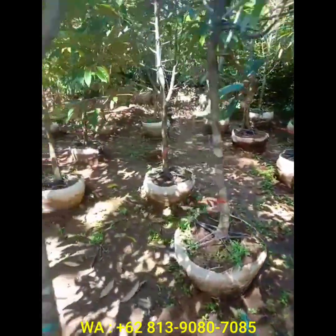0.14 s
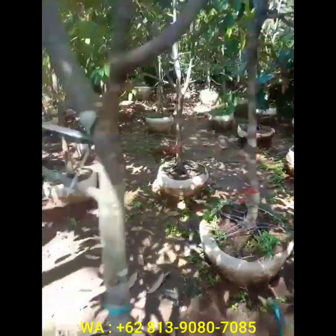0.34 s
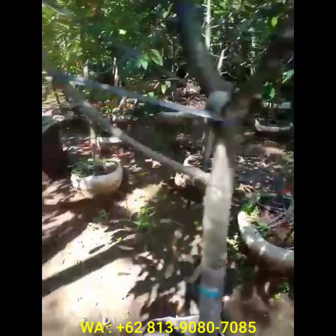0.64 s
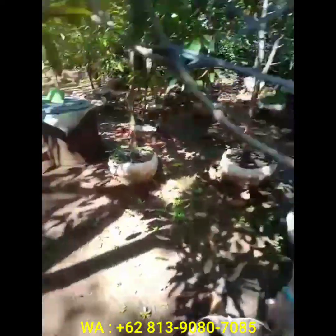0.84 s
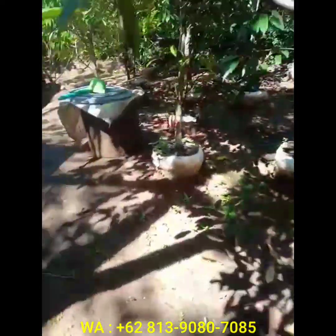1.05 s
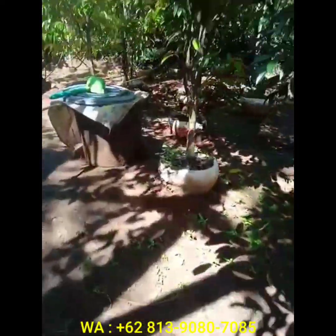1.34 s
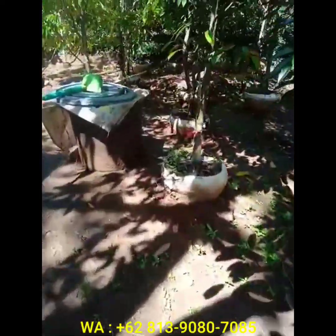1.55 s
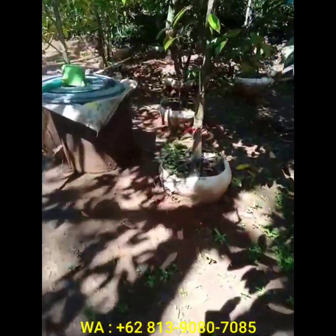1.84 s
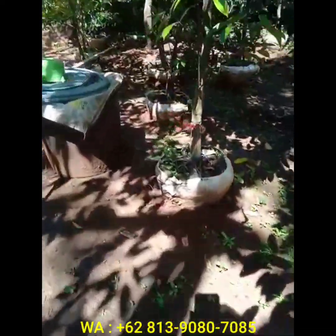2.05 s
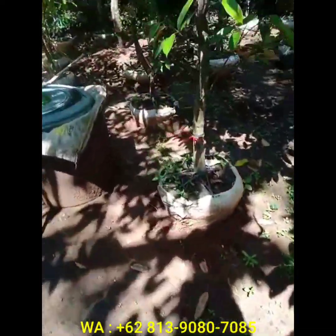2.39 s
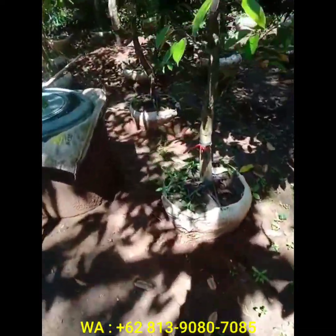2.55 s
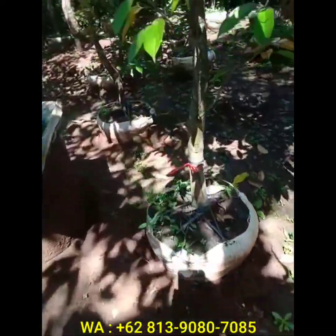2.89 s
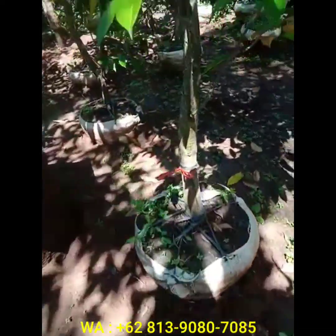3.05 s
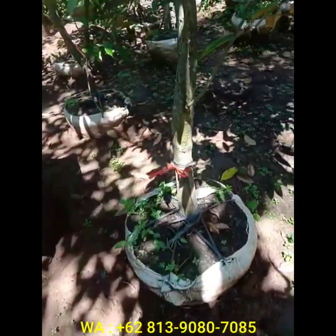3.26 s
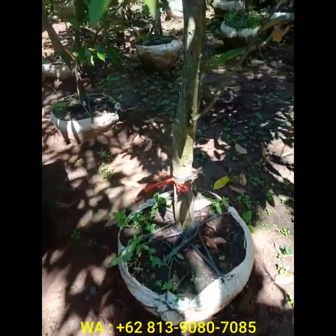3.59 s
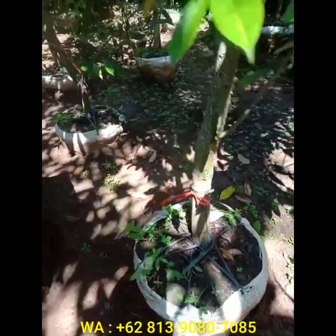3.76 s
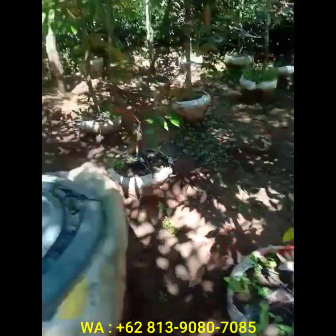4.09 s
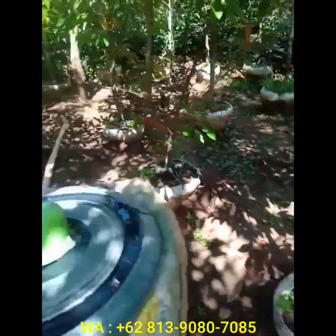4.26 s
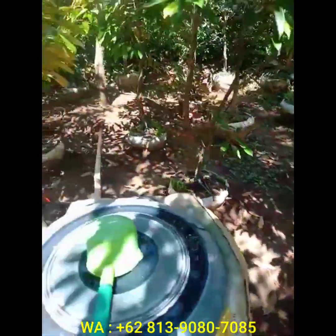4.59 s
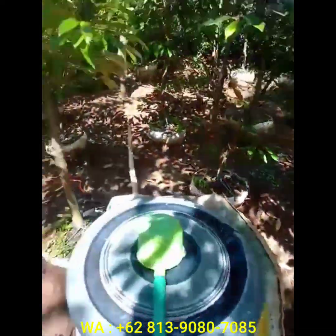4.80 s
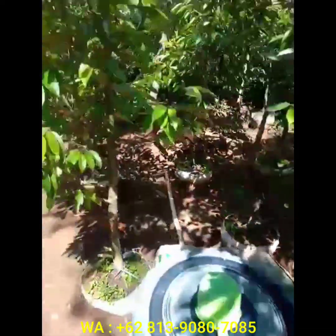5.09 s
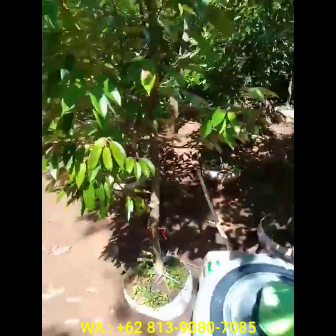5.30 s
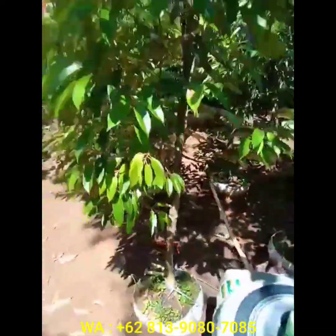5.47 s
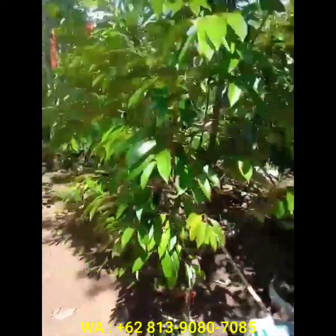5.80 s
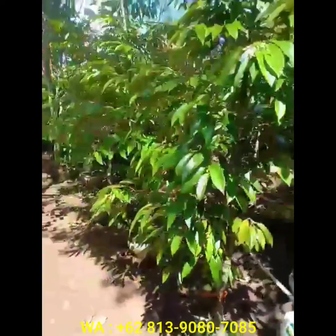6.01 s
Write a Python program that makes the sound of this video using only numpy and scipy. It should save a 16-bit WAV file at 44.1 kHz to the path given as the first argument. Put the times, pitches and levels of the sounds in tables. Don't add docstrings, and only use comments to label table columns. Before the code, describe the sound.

Slow steps crush dry leaves and snap twigs, loudest in the first two seconds, then sparse crackles, a hollow scuff and foliage brushing past.

```python
import sys
import numpy as np
from scipy import signal
from scipy.io import wavfile

SR = 44100
rng = np.random.default_rng(int(sys.argv[2]) if len(sys.argv) > 2 else 0)


def unload_wav(signal):
    wavfile.write(
        sys.argv[1],
        SR,
        np.round(np.clip(np.atleast_2d(signal).T, -1, 1) * 32767).astype(np.int16),
    )


def convert_level_to_amplitude(level_db):
    exponent = np.asarray(level_db, float) / 20
    return 10 ** exponent


N = 270897


def rms_one(x):
    return x / np.sqrt(np.mean(x ** 2) + 1e-20)


def peak_one(x):
    return x / np.max(np.abs(x))


def band(x, low_hz, high_hz):
    sos = signal.butter(2, [low_hz, high_hz], "band", fs=SR, output="sos")
    return signal.sosfilt(sos, x + 1e-18)


def resonance(x, hz, width_hz):
    r = np.exp(-np.pi * width_hz / SR)
    zeros = np.array([1, 0, -1]) * (1 - r * r) / 2
    poles = [1, -2 * r * np.cos(2 * np.pi * hz / SR), r * r]
    return signal.lfilter(zeros, poles, x + 1e-18)


def drift(rate_hz):
    r = np.exp(-80 * np.pi * rate_hz / SR)
    slow = signal.lfilter([1], [1, -2 * r, r * r], rng.standard_normal(N // 40 + 2002))[2000:]
    return np.interp(np.arange(N) / 40, np.arange(len(slow)), rms_one(slow))


def swells(starts, lengths, levels_db, rise, fall, rest_db):
    t = np.arange(0, N + 64, 64) / SR
    s, length, db = (np.array(v)[:, None] for v in (starts, lengths, levels_db))
    before, after = np.maximum(s - t, 0), np.maximum(t - s - length, 0)
    power = convert_level_to_amplitude(2 * (db - rise * before - fall * after))
    total_db = 10 * np.log10(power.sum(axis=0) + convert_level_to_amplitude(2 * rest_db))
    return np.interp(np.arange(N) / SR, t, total_db)


def coloured(spectrum, patchy_db, rate_hz):
    hz, level_db = np.transpose(spectrum)
    edges = np.geomspace(hz[0], hz[-1], 14)
    white, out = rng.standard_normal((2, N)), 0
    for k, (low, high) in enumerate(zip(edges, edges[1:])):
        here_db = np.interp(np.log(low * high) / 2, np.log(hz), level_db)
        gaps = np.minimum(drift(rate_hz), 1)
        out = out + convert_level_to_amplitude(here_db + patchy_db * gaps) * band(white[k % 2], low, high)
    return rms_one(out)


# start in seconds, length in seconds,
# crisp level in dB, body in dB against crisp, air in dB against crisp.
TREADS = [(0.0, 0.16, -42, 0, -13), (0.392, 0.024, -41, -2.5, -8), (0.44, 0.037, -32, -16, -18),
          (0.508, 0.034, -33, -6.5, -24), (0.677, 0.081, -31.5, -17, -25),
          (0.772, 0.064, -33.5, -13.5, -12), (0.86, 0.071, -32, -11, -14),
          (1.061, 0.069, -31.5, -11.5, -15), (1.152, 0.04, -22.5, -6.5, -5),
          (1.188, 0.045, -22.5, -10, 0.5), (1.254, 0.07, -29.5, -8.5, 1), (1.364, 0.068, -36, -12, -9),
          (1.417, 0.11, -49.5, 0, -21), (1.67, 0.052, -45.5, -6, -4), (1.788, 0.081, -38, -13, -24),
          (1.881, 0.027, -25.5, -23, 9), (1.906, 0.034, -35, -7, 1), (1.976, 0.086, -32.5, -7, -10),
          (2.077, .12, -33.5, -3.5, -12), (2.407, 0.14, -38.5, -20, -8.5), (2.514, 0.079, -39.5, -10.5, -8),
          (2.71, 0.097, -34, -10, -6.5), (3.026, 0.0077, -41.5, -6, 6), (3.4, 0.17, -44, -7, -9),
          (3.597, 0.52, -51.5, -18, -8), (3.966, 0.38, -52, 3.5, -21), (4.365, 0.02, -45, 1, -16),
          (4.479, 0.027, -71, -39, -16), (4.994, 0.089, -41, -13, -8), (5.156, 0.047, -48.5, -2.5, -2),
          (5.368, 0.12, -47.5, 3, -7), (5.692, 0.024, -37.5, -6.5, -5), (5.817, 0.14, -50, 1, -5)]
RISE_DB_PER_S, FALL_DB_PER_S = 485, 135
AIR_FALL_DB_PER_S = 600
STIR_CRISP_DB, STIR_BODY_DB, STIR_AIR_DB, STIR_LOW_DB = -59, -55, -80, -59.5
GROUND_DB = -26.5


def pressure():
    s, length, crisp_db, body_db, air_db = np.transpose(TREADS)
    parts = [(0, FALL_DB_PER_S, STIR_CRISP_DB),
             (body_db, FALL_DB_PER_S, STIR_BODY_DB),
             (air_db, AIR_FALL_DB_PER_S, STIR_AIR_DB),
             (body_db + GROUND_DB, FALL_DB_PER_S, STIR_LOW_DB)]
    return [swells(s, length, crisp_db + rel_db, RISE_DB_PER_S, fall, rest_db) for rel_db, fall, rest_db in parts]


ZONES_HZ = [350, 800, 2200, 8200, 17500]
CRACKS_PER_S, TICKS_PER_S = 1800, 260
RUSTLE_DB, TICK_DB, AIR_TICK_DB = -1, -12, -20.4
SCRAP_SHARPNESS = 3.4
PATCHY_DB = 17


def crush():
    crisp_db, body_db, air_db, low_db = pressure()
    clump = drift(45)
    sizes = convert_level_to_amplitude(-np.minimum(rng.exponential(1, N), 4.5)) * rng.choice([-1, 1], N)
    cracks = sizes * (rng.random(N) < CRACKS_PER_S * convert_level_to_amplitude(3 * clump) / SR)
    ticks = sizes * (rng.random(N) < TICKS_PER_S / SR)
    dealt = rng.integers(0, 8, N)
    rub, out = rng.standard_normal((2, N)), 0
    for zone, level_db in enumerate([low_db - 4.5, body_db - 11, crisp_db - 5, air_db - 11]):
        low, high = ZONES_HZ[zone], ZONES_HZ[zone + 1]
        is_air = zone == 3
        many = np.clip((level_db + 48) / 16, 0, .7)
        patches_db = PATCHY_DB * (not is_air) * (1 - .47 * many)
        layer = 0
        for k, hz in enumerate(low * (high / low) ** np.linspace(.06, .94, 8)):
            scrap = rms_one(resonance(cracks * (dealt == k), hz, hz / SCRAP_SHARPNESS))
            hiss = rms_one(resonance(rub[k % 2], hz, hz / (10 if is_air else 45)))
            gaps = np.minimum(drift(5), .7)
            layer = layer + hz ** .7 * convert_level_to_amplitude(patches_db * gaps) * (scrap + convert_level_to_amplitude(RUSTLE_DB) * hiss)
        tick = convert_level_to_amplitude(AIR_TICK_DB if is_air else TICK_DB) * rms_one(band(ticks, low, high))
        out = out + convert_level_to_amplitude(level_db) * rms_one(band(rms_one(layer) + tick, low, high))
    return out


# time in seconds, peak in dB, pitch in Hz, extra air in dB.
RIB_SNAPS = [(.4348, -17, 5760, -30), (0.506, -13.5, 5950, -32), (0.639, -17.5, 6000, -34),
             (0.693, -17, 5800, -33), (0.7499, -9.5, 6300, -19), (0.807, -3.5, 6350, -32),
             (0.773, -12, 7400, -30), (0.7889, -10, 7700, -25), (0.8, -16, 5500, -30),
             (0.8217, -11, 6000, -30), (0.877, -16, 5560, -25), (.9420, -14, 5800, -30),
             (1.1075, -13, 4960, -30), (1.1314, -10, 7180, -25), (1.1442, -10, 6560, -25),
             (1.1945, -2, 5530, -27), (1.219, -5, 6200, -29), (1.226, -4, 6030, -27), (1.23, -5, 6300, -27),
             (1.3188, -5, 5530, -25), (1.363, -9, 6800, -30), (1.392, -30, 5000, -28),
             (2.1928, -14, 6530, -27), (5.0237, -16.5, 6000, -20), (5.086, -28, 5530, -28),
             (5.6926, -13, 5200, -22), (0.8903, -4, 5400, -35), (0.902, -7.5, 4200, -30),
             (0.9305, -9, 5760, -11), (1.0525, -18, 6340, -23), (3.903, -27, 6500, -22),
             (3.874, -38, 7000, -22), (4.341, -25.5, 2970, -30), (1.098, -3.5, 6760, -42),
             (1.1744, -6, 7250, -16), (1.2048, 5, 6550, -27), (1.2129, 5.5, 6460, -27),
             (1.237, 1, 6300, -24), (1.2456, 1.5, 6300, -26), (1.2867, -0.5, 6860, -17),
             (1.2998, 0, 6800, -9), (1.3655, -4.5, 6700, -36), (1.3725, -7.5, 4630, -37),
             (2.1743, -13, 6100, -27), (2.7645, -13, 6200, -27), (3.022, -22, 5860, -20),
             (3.0257, -17, 5800, -40), (3.1688, -22, 7760, 4), (4.4713, -8, 5800, -26),
             (4.4757, -27, 5860, -25), (4.98, -19, 5010, -28)]
# time in seconds, peak in dB, pitch in Hz, extra body in dB.
TWIG_SNAPS = [(0.03, -13.5, 4160, 5), (0.046, -34, 2500, 13.5), (0.351, -32.5, 2570, 9),
              (0.478, -30, 2500, 8.5), (0.555, -13, 5840, 5.5), (0.852, -27, 5700, -13),
              (1.1133, -6, 2920, 1), (1.153, -15.5, 7440, 6), (1.19, 12, 4870, -13),
              (1.327, -18.5, 2800, 5.5), (1.885, -10, 4930, -10), (2.106, -15, 2430, -12),
              (2.2046, -15, 5700, -5), (2.214, -11.5, 2310, -19), (2.6949, -26, 5990, 0),
              (2.74, -18, 6060, 3), (3.0365, -25.5, 2600, 11), (3.0508, -33, 3070, 12),
              (3.429, -31, 5870, 4), (3.798, -46, 2630, 2), (3.9949, -22.5, 2190, -6),
              (5.003, -27, 5330, 0), (5.078, -21, 6000, -6), (5.3527, -24, 3300, -7),
              (5.711, -38, 5000, 15.5), (5.955, -37.5, 2780, 15.5)]
# time in seconds, peak in dB, pitch in Hz, extra body in dB.
POPS = [
    (1.834, -17, 2380, -14),
    (1.973, -9.5, 3500, -4.5),
    (3.634, -9.5, 2820, -36),
    (4.36, -20, 3270, -5),
    (5.2584, -33, 1890, 19.5),
]
# time in seconds, peak in dB, pitch in Hz.
BLADE_SNAPS = [(1.478, -20, 6060), (1.5833, -20, 6900), (1.607, -20, 3020), (1.773, -32, 2820),
               (1.819, -28, 2520), (2.099, -20, 2570), (2.148, -27, 2470), (2.518, -22, 3900),
               (2.559, -14.5, 4600), (3.8851, -22, 5240), (4.978, -28, 4630), (5.683, -16, 2770)]
# time in seconds, peak in dB, pitch in Hz.
EDGE_SNAPS = [(0.559, -24, 7500), (1.052, -19, 7500), (1.136, -4, 8100), (1.151, -27, 7500),
              (1.169, -2, 7900), (1.29, -13, 7500), (1.303, -0.5, 6960), (1.305, -3, 6900),
              (1.937, -11, 8150), (2.008, -24, 7500), (2.017, -19, 7500), (2.03, -29, 7540),
              (2.152, -15, 7950), (2.748, -17, 7550), (3.145, -30, 7000)]
# body in dB and air in dB against crisp, rattle t60 in seconds
RIB, TWIG, POP = (-28, -1.5, .014), (.59, -35, .015), (0, -25, .004)
BLADE, EDGE = (-49, -22, .055), (-40, 1, .018)
HARD_SHORTENS = .069


def breaks():
    rows = [(s, db, hz, 0, air_db, RIB) for s, db, hz, air_db in RIB_SNAPS]
    rows += [(*row, 0, TWIG) for row in TWIG_SNAPS]
    rows += [(*row, 0, POP) for row in POPS]
    rows += [(*row, 0, 0, BLADE) for row in BLADE_SNAPS]
    rows += [(*row, 0, 0, EDGE) for row in EDGE_SNAPS]
    return [(s, db, hz, body_db + more_body_db, air_db + more_air_db, t60 * (2 - HARD_SHORTENS * (db + 12)))
            for s, db, hz, more_body_db, more_air_db, (body_db, air_db, t60) in rows]


def snaps():
    out, age = np.zeros(N + 3000), np.arange(3000) / SR
    leaf_top = signal.butter(4, 9000, fs=SR, output="sos")
    for s, peak_db, hz, body_db, air_db, t60 in breaks():
        burst = rng.standard_normal(3000) * convert_level_to_amplitude(-60 * age / np.clip(t60, .003, .06)) * .5
        burst[0] = 5.5
        dry_break = t60 < .011 and peak_db < -8
        wide = band(burst, min(.55 * hz, 2900), 8300)
        ring = (1 if dry_break else 4) * resonance(burst, hz, hz / 7)
        crisp = peak_one(band(wide + ring, 1400, 8300))
        crisp = peak_one(signal.sosfilt(leaf_top, crisp))
        body = peak_one(band(band(burst, 420, 6500), 620 if dry_break else 900, 2320))
        air = peak_one(band(burst, 8200, 17500))
        at = round(s * SR)
        snap = crisp + convert_level_to_amplitude(body_db - 2.5) * body + convert_level_to_amplitude(air_db) * air
        out[at:at + 3000] += convert_level_to_amplitude(peak_db - 8.5) * snap
    return out[:N]


# start in seconds, length in seconds, crisp level in dB, body level in dB.
CRUNCHES = [(0.037, 0.008, -68, -43), (1.294, 0.012, -22, -42), (1.551, 0.058, -45.5, -65),
            (1.844, 0.0084, -35.5, -38.5), (1.854, 0.019, -20, -26.5), (1.868, 0.019, -23.5, -31.5),
            (1.886, 0.016, -22, -28.5), (1.903, 0.013, -31, -35.5), (1.149, 0.0094, -29.5, -32),
            (1.237, 0.0062, -31, -40), (1.253, 0.0074, -26, -39), (1.271, .007, -25.5, -44),
            (1.285, .003, -33, -45), (1.3457, 0.0043, -25.5, -58), (2.102, 0.015, -42, -45.5),
            (2.014, 0.017, -45, -40), (1.592, 0.009, -40, -62), (2.2, 0.0086, -37, -34),
            (3.024, 0.0095, -76, -39.5), (3.048, 0.012, -55, -42), (3.784, 0.021, -74, -72),
            (4.464, 0.014, -31.5, -69), (4.963, 0.031, -47, -56), (4.997, 0.05, -43.5, -46),
            (5.073, 0.023, -56, -66), (5.25, 0.037, -47, -45.5), (5.673, 0.012, -38.5, -59)]


def crunches():
    t, out = np.arange(N) / SR, 0
    sizes_db = 1.5 * np.minimum(rng.exponential(1, N), 4) + 1.2 * drift(90)
    cracks = rng.standard_normal(N) * convert_level_to_amplitude(sizes_db)
    crisp = rms_one(band(band(cracks, 1450, 10200), 2680, 8500))
    body = rms_one(band(band(cracks, 160, 4140), 474, 3660))
    for s, length, crisp_db, body_db in CRUNCHES:
        rise_s, fall_s = min(.44 * length, .012), .0056 + .2 * length
        rise = np.clip((t - s) / rise_s, 0, 1) ** 2
        fall = np.exp(-np.maximum(t - s - length, 0) / fall_s)
        out = out + rise * fall * (convert_level_to_amplitude(crisp_db) * crisp + convert_level_to_amplitude(body_db) * body)
    return out


# pitch in Hz, width in Hz.
HOLLOW = [(186, 74), (528, 38)]
# start in seconds, length in seconds, low mode in dB,
# upper mode in dB, grit in dB.
DRAGS = [(1.114, 0.027, -43, -78, -51), (1.888, 0.033, -46.5, -62, -39.5), (1.325, 0.054, -50, -81, -46),
         (3.538, 0.04, -76, -46.5, -64), (3.609, 0.023, -39, -39, -57.5), (3.653, 0.032, -37.5, -40, -54.5),
         (3.704, 0.024, -36, -39, -62), (3.809, 0.0069, -37, -40, -45), (3.82, 0.031, -33.5, -41.5, -58),
         (3.866, 0.027, -36.5, -46, -58), (3.925, 0.016, -43, -48, -59), (4.046, 0.019, -48, -57, -54)]


def scuff():
    tugs = rng.standard_normal(N) * (.13 + (rng.random(N) < 160 / SR))
    s, length, *columns = np.transpose(DRAGS)
    *levels, grit_db = [swells(s, length, c, rise=505, fall=328, rest_db=-99) for c in columns]
    out = convert_level_to_amplitude(grit_db) * rms_one(band(tugs, 290, 1090))
    for level_db, (hz, width_hz) in zip(levels, HOLLOW):
        mode = resonance(resonance(tugs, hz, width_hz), hz, 3.2 * width_hz)
        out = out + convert_level_to_amplitude(level_db - 4) * rms_one(mode)
    return out


# start in seconds, length in seconds,
# first pitch in Hz, last pitch in Hz, level in dB.
SWISHES = [(.04, 0.4, 2303, 2223, -53.5), (2.412, 0.18, 1904, 3060, -52.5), (3.992, 0.17, 2425, 2160, -54),
           (4.002, 0.084, 3730, 3530, -47), (4.302, 0.33, 700, 868, -56), (4.332, 0.21, 3740, 6080, -51),
           (4.482, 0.097, 5670, 4210, -50), (4.93, 0.14, 4830, 4360, -48.5), (5.352, .17, 3550, 3400, -48),
           (5.362, 0.12, 1820, 1804, -52.5), (5.552, 0.23, 223.3, 245, -52.5),
           (5.802, 0.14, 2430, 2136, -56)]
# start in seconds, length in seconds,
# first pitch in Hz, last pitch in Hz, level in dB.
STROKES = [(.062, 0.3, 4000, 3820, -53), (.142, 0.077, 5470, 5230, -57), (1.662, 0.057, 2250, 2650, -55.5),
           (2.51, 0.075, 4150, 4700, -45), (2.56, 0.079, 4800, 4900, -44.5), (3.93, 0.26, 5370, 5270, -49),
           (2.585, 0.13, 4320, 3850, -46), (2.42, 0.28, 1950, 2100, -63), (2.96, 0.14, 5720, 5600, -58),
           (0.002, 0.1, 7600, 7350, -61), (.13, 0.13, 4800, 4900, -54), (.195, 0.044, 2140, 2060, -70),
           (3.37, 0.13, 5700, 5770, -55), (3.355, 0.14, 2640, 2710, -56.5), (4.01, 0.24, 2630, 2620, -54.5),
           (4.03, 0.36, 2190, 2060, -71), (4.98, 0.12, 3660, 3520, -62), (5.1, 0.1, 6100, 5960, -57),
           (5.15, .1, 7100, 7200, -59), (5.26, 0.047, 5810, 5800, -48), (5.52, 0.17, 4240, 3870, -59),
           (2.3, 0.078, 2450, 2400, -57), (2.44, 0.26, 6230, 6020, -51), (3.065, 0.13, 2920, 2880, -56.5),
           (3.27, 0.09, 4230, 4870, -57), (3.3, 0.17, 4700, 4700, -57), (3.412, 0.08, 1270, 1527, -54),
           (3.695, 0.2, 5380, 5330, -44.5), (3.83, .17, 5300, 5350, -48.5), (3.8, 0.09, 3820, 3400, -50.5),
           (3.89, 0.13, 3780, 3850, -53.5), (3.71, 0.078, 3380, 3300, -57), (3.95, .25, 7540, 7400, -59),
           (3.83, .09, 4750, 4800, -50), (3.882, 0.25, 1607, 1583, -53.5), (3.998, 0.22, 5200, 5000, -52),
           (4.152, 0.11, 3370, 3240, -48.5), (4.52, 0.094, 6000, 5900, -56.5),
           (5.36, 0.11, 5630, 5400, -56), (5.5, 0.23, 7070, 7040, -59), (5.82, 0.14, 5980, 5750, -55),
           (5.962, 0.07, 4000, 4060, -54), (6.07, .07, 4500, 4800, -53)]
# start in
# seconds, length in seconds, first pitch in Hz, last pitch in Hz, level in dB.
SQUEAKS = [
    (1.722, 0.048, 596, 610, -51.5),
    (3.797, 0.19, 657, 567, -44),
    (3.797, 0.047, 1250, 1280, -53),
    (4.525, .1, 1420, 1450, -64),
    (3.97, 0.074, 725, 724, -51.5),
    (4.302, 0.3, 704, 683, -59),
    (4.352, 0.33, 1440, 1410, -58.5),
]
SWISH_SHARPNESS, STROKE_SHARPNESS, SQUEAK_SHARPNESS = 4.1, 13.2, 34


def swishes():
    out, broken = np.zeros(N + SR), drift(35)
    kinds = [(SWISHES, SWISH_SHARPNESS), (STROKES, STROKE_SHARPNESS), (SQUEAKS, SQUEAK_SHARPNESS)]
    events = [(*row, sharpness) for rows, sharpness in kinds for row in rows]
    for s, length, from_hz, to_hz, level_db, sharpness in events:
        width_hz = from_hz / sharpness
        noise = rng.standard_normal((2, SR // 2))
        way = np.linspace(0, 1, round(length * SR))
        low_pass = signal.butter(2, width_hz / 2, fs=SR, output="sos")
        flutter = signal.sosfilt(low_pass, noise)[:, -len(way):]
        phase = 2 * np.pi * np.cumsum(from_hz + (to_hz - from_hz) * way) / SR
        hiss = rms_one(flutter[0] * np.cos(phase) + flutter[1] * np.sin(phase))
        swell = np.minimum(way / .16, 1) * np.minimum((1 - way) / .4, 1)
        at = round(s * SR)
        patches_db = 2 * broken[at:at + len(way)]
        out[at:at + len(way)] += convert_level_to_amplitude(level_db + patches_db) * hiss * swell
    return out[:N]


def thump():
    start_s, length_s, level_db, hz = 5.895, .1, -35.5, 65
    age = np.clip(np.arange(N) / SR - start_s, 0, length_s)
    return convert_level_to_amplitude(level_db) * np.sin(np.pi * age / length_s) * np.sin(2 * np.pi * hz * age)


# time in seconds, level in dB.
FOOTFALLS = [(.09, -48), (.42, -47), (.58, -45.5), (.73, -62), (.83, -46), (1.15, -54), (1.35, -46.5),
             (1.95, -48), (2.33, -48.5), (2.57, -52), (2.82, -48.5), (3.35, -49.5), (3.45, -47.5),
             (4.42, -54), (5.0, -50.5), (5.32, -43.5), (5.7, -67), (3.63, -47), (3.86, -44), (4.22, -52),
             (4.741, -42.5), (5.93, -61)]
# frequency in Hz, density in dB per Hz.
RUMBLE_COLOUR = [(15, -67), (25, -46), (38, -20), (73, -8), (100, 7), (150, 0), (209, -8), (302, -11.5),
                 (420, -35), (550, -54), (920, -120)]
# frequency in Hz, density in dB per Hz.
HUSH = [(180, -20), (300, -25.5), (346, 36.5), (964, -26), (1240, -34), (1780, 10), (5960, 17.5),
        (9000, 11), (11700, -61), (19800, -120)]
RUMBLE_DB, HUM_DB, HUSH_DB = -53.5, -64.5, -61
HUM_HZ = 297.8


def background():
    s, db = np.transpose(FOOTFALLS)
    rumble_db = swells(s, 0 * s, db, rise=178, fall=200, rest_db=RUMBLE_DB)
    rumble = convert_level_to_amplitude(rumble_db + 2.2 * drift(7)) * coloured(RUMBLE_COLOUR, patchy_db=1.8, rate_hz=6)
    hum = resonance(resonance(rng.standard_normal(N), HUM_HZ, 3.4), HUM_HZ, 34)
    hush = coloured(HUSH, patchy_db=3.5, rate_hz=4.6)
    return rumble + convert_level_to_amplitude(HUM_DB) * rms_one(hum) + convert_level_to_amplitude(HUSH_DB) * hush


def scene():
    mid = crush() + snaps() + crunches() + scuff() + swishes() + thump() + background()
    side = convert_level_to_amplitude(-32) * mid * drift(60)
    return np.array([mid + side, mid - side])


def self_noise():
    shared, apart = rng.standard_normal((2, N))
    side = band(apart, 97, 5500) + .91 * band(apart, 25, 380) + .4 * band(apart, 9400, 13000) + .8 * apart
    return convert_level_to_amplitude(-57.5) * shared + convert_level_to_amplitude(-63.5) * side * [[1], [-1]]


# frequency in Hz, width in Hz, gain in dB.
PORT = [(1580, 1680, 2.5), (1197, 49, 6), (1260, 80, 7), (6060, 800, 6), (6510, 320, -30), (7183, 320, 8.5),
        (7460, 12400, -10), (13330, 5250, -9), (14960, 560, 8)]


def microphone_port(x):
    for hz, width_hz, gain_db in PORT:
        x = x + (convert_level_to_amplitude(gain_db) - 1) * resonance(x, hz, width_hz)
    return x


def band_limit(x):
    return signal.sosfilt(signal.butter(12, 16650, fs=SR, output="sos"), x)


def record(dry):
    x = microphone_port(dry + self_noise())
    rounded = 1.436 * np.tanh(convert_level_to_amplitude(-1) * x / 1.358)
    top_cut = signal.ellip(10, .5, 70, 15700, fs=SR, output="sos")
    mix = signal.sosfilt(top_cut, rounded) - .0007
    return band_limit(mix)


dry = scene()
out = record(dry)
unload_wav(out)
```